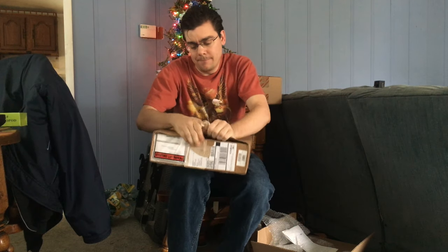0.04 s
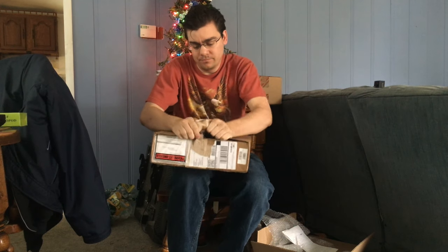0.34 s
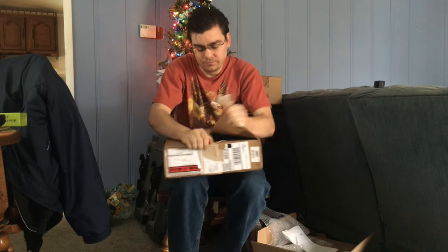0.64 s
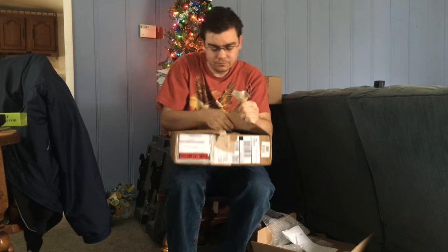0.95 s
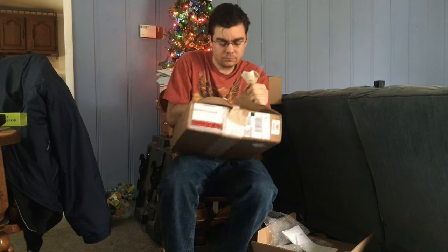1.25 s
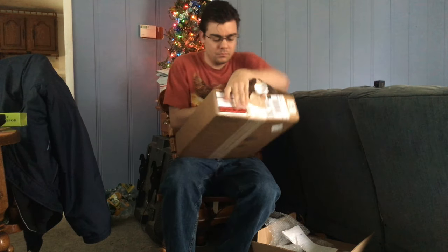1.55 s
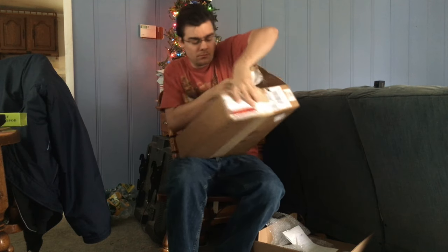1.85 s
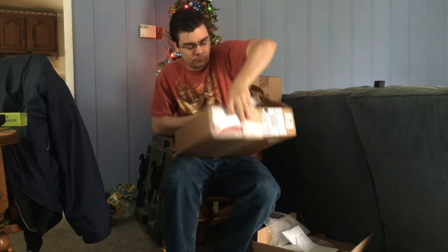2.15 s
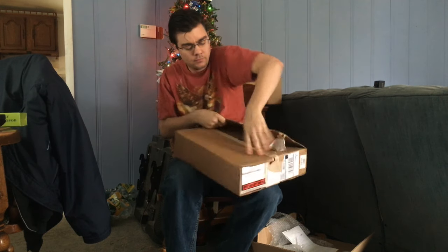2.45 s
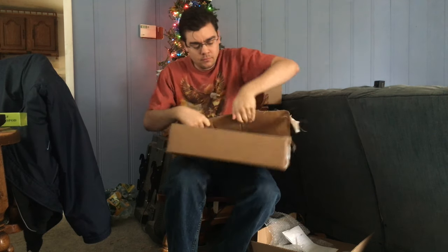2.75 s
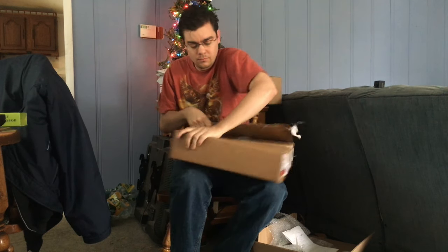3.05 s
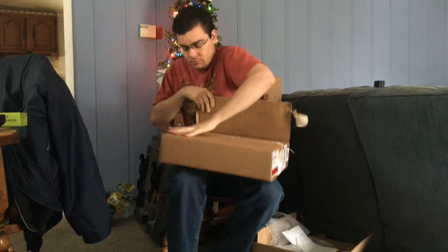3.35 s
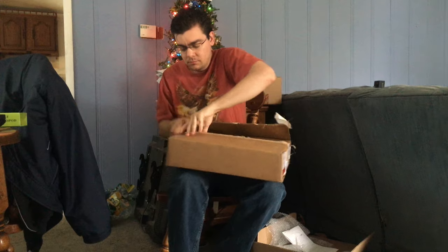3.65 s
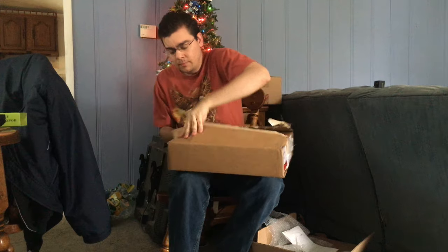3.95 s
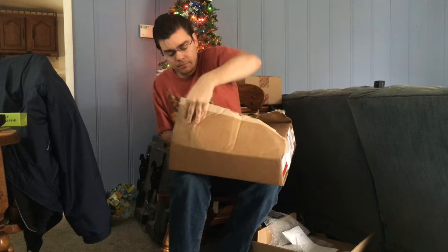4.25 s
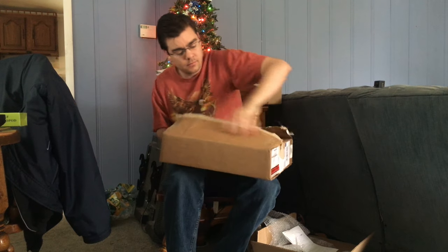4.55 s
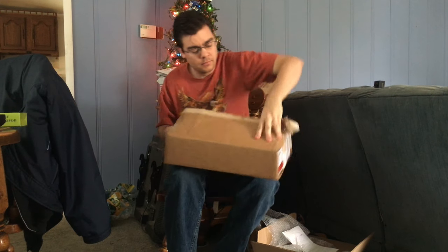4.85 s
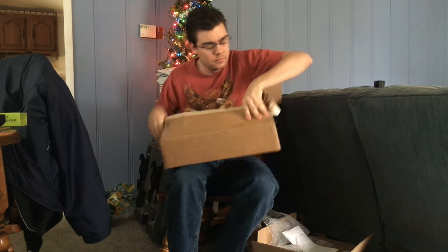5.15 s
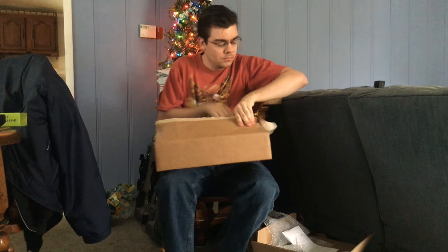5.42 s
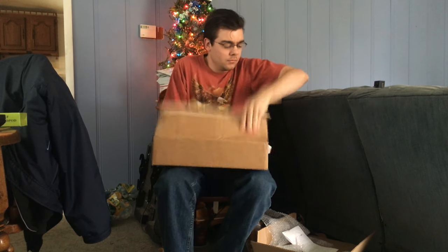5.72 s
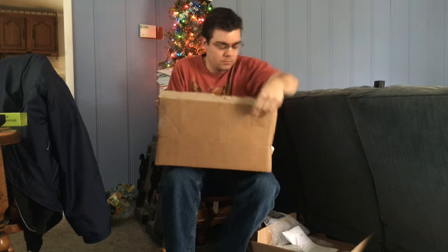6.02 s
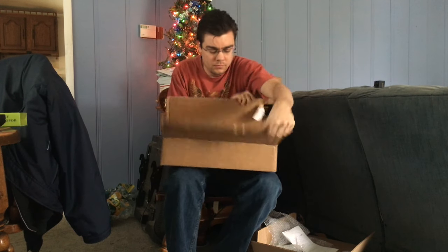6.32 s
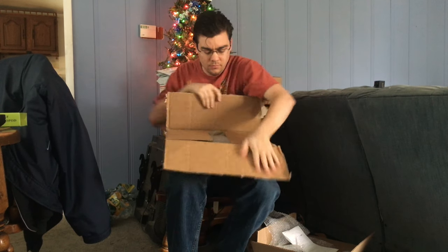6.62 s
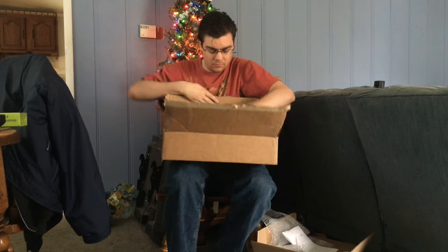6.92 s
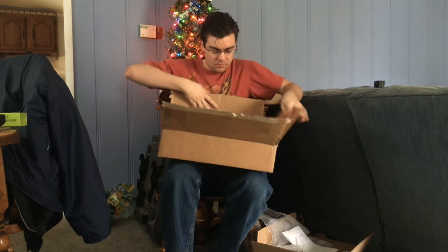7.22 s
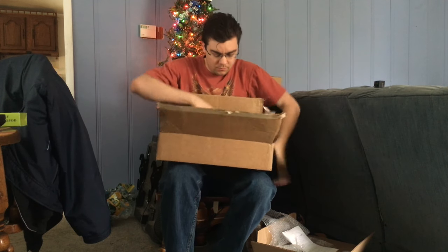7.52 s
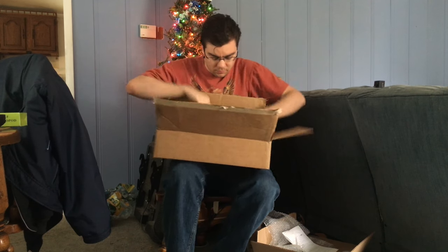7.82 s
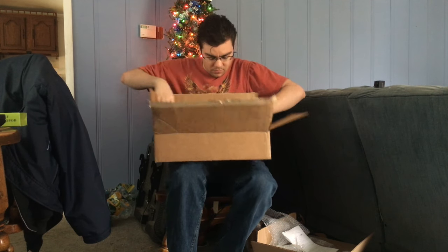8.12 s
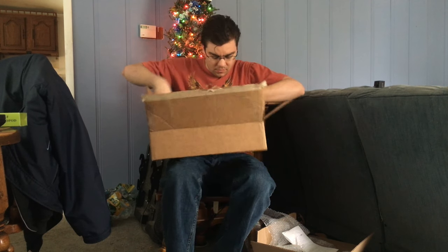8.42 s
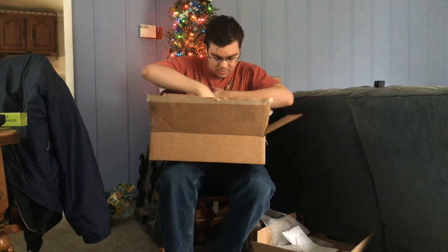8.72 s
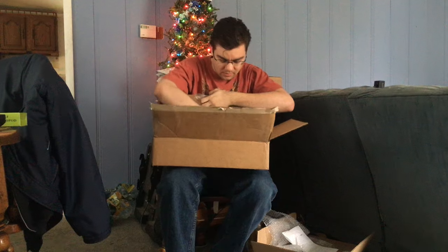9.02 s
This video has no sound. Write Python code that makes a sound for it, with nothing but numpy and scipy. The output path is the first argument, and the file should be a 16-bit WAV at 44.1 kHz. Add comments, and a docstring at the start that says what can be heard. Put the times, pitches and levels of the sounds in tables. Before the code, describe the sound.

Sharp bursts of ripping tape and cardboard come in quick succession as a box is pulled open by hand, with dry crinkles and briefly ringing flaps. A few separate tears follow among light knocks and rubbing. The box lands with a low, hollow thump, then softer scraping and hissing slides fade away. It is heard from a few steps off in a small, quiet room with a faint hum.

```python
"""A small furnished room: a few steps away, a cardboard shipping box is torn open on a lap.
Tape and glued flaps give way in bursts of tiny fractures that shake the panels, flaps and paper fibres.
Freed flaps twang and loose tape crinkles; hands knock, rub and scrape the board, and the hollow box
bumps on the knees. Faint room air and hum lie underneath. A limiter holds the loudest peaks."""
import sys
import numpy as np
from scipy import signal
from scipy.fft import rfft, irfft, next_fast_len
from scipy.io import wavfile
from scipy.ndimage import uniform_filter1d, minimum_filter1d, map_coordinates

SR = 44100
rng = np.random.default_rng(int(sys.argv[2]) if len(sys.argv) > 2 else 0)


def store_pcm(level_fs):
    """Save levels as 16-bit WAV."""
    pcm = np.round(np.clip(level_fs, -1, 1) * 32767).astype(np.int16)
    wavfile.write(sys.argv[1], SR, np.atleast_2d(pcm).T)


N = 408807
STRAIN_S = 0.008  # fibres strain this long before a break
ROOM_T60_S, ECHO_BUILD_S = (0.2, 0.28, 0.28), (0.0072, 0.0012, 0.0007)  # panel, flap, fibre


# freq_hz, gain_db
FIBRE_SPECTRUM = [(1900, 2), (2150, 3.5), (2500, 7), (3000, 2.5), (3500, 6), (4300, 3), (5000, 0),
                  (7200, -5.5), (8400, -3), (10300, -9), (11800, -6), (14500, -12.5), (17000, -14)]
# start_s, level_db, depth (0 tape, 1 board), length_s
RIPS = [(0.223, -36, 0.46, 0.0015), (0.337, -43.5, 0.23, 0.0053), (0.431, -31.5, 0.29, 0.0018),
        (0.476, -35.5, .05, 0.0026), (0.512, -15, 0.03, 0.0037), (0.526, -16, 0.46, 0.0037),
        (0.561, -17, 0.5, 0.0017), (0.594, -20, 0.17, 0.0032), (0.599, -29, 0.59, .0012),
        (0.631, -22.5, .25, 0.0067), (0.716, -18.5, 0.39, 0.008), (0.721, -25, 1, 0.0016),
        (1.103, -32, 0.23, 0.011), (1.136, -15, 0.24, 0.013), (1.142, -18.5, 0.73, 0.0029),
        (1.162, -20.5, 0.48, 0.012), (1.335, -15.5, 0.5, 0.017), (1.417, -30.5, 0.47, 0.0062),
        (1.624, -28.5, 0.4, 0.0082), (1.759, -11.5, 0.73, 0.018), (1.784, -14.5, 0.89, 0.0063),
        (3.133, -20.5, 0.58, 0.022), (3.174, -16.5, 0.64, 0.0052), (3.801, -40.5, 0.13, 0.0062),
        (4.032, -31.5, 0.53, 0.017), (4.1, -14, 0.72, 0.0033), (4.162, -22, 0.72, 0.006),
        (5.728, -26, 0.57, 0.014), (5.78, -16, 0.81, 0.0056)]

def rips():
    """Tape and glue give way; deeper tears shake panels and flaps more and crackle less."""
    tape_db, board_db = np.array([-28, -8.5, 2]), np.array([5, 0, -8.5])  # panel, flap, fibre
    events = []
    for start_s, level_db, depth, length_s in RIPS:
        drive_db = tape_db + np.clip(depth, 0, 1) * (board_db - tape_db)
        events.append((start_s, *(level_db + drive_db), length_s))
    return excite_box(events, fracture_force, FIBRE_SPECTRUM,
                      trims_db=(2.5, 1.3, 0.5), wets_db=(6, 2, -1.5), soft_hz=5100)


def fracture_force(t, length_s, crack_s=0.0028, spread_db=7, strain_db=-27):
    """A few fibres give, then one sharp break and a fading run of snaps; shorter runs break harder."""
    envelope = np.where(t < 0, amp(strain_db) * (1 + t / STRAIN_S), np.exp(-(t / length_s) ** 2))
    snaps = slips(len(t), rate_hz=1500, spread_db=spread_db) * envelope
    crack = crack_s / length_s * (t == 0)
    return snaps / (np.linalg.norm(snaps) + 1e-9) + crack


def slips(size, rate_hz, spread_db):
    """Tiny fractures or slips, random in time and strength."""
    happens = rng.random(size) < rate_hz / SR
    return happens * amp(spread_db * rng.standard_normal(size)) * rng.choice([-1, 1], size)


def excite_box(events, force, paper_spectrum, trims_db, wets_db, soft_hz):
    """A force drives the box at each event: start_s, panel_db, flap_db, fibre_db, length_s."""
    track, size = np.zeros(N), 2 ** 14
    t = (np.arange(SR // 9) - round(STRAIN_S * SR)) / SR
    panel, flap, fibre = box_responses(size, paper_spectrum)
    soft_flap = flap / (1 + 1j * np.fft.rfftfreq(size, 1 / SR) / soft_hz)  # soft contact: less treble
    for start_s, *levels_db, length_s in events:
        drive = force(t, length_s)
        grip = grip_colour(size, depth_db=2.2, step_hz=160)
        voices = zip((panel, soft_flap, fibre), levels_db, trims_db, ROOM_T60_S, wets_db, ECHO_BUILD_S)
        for response, level_db, trim_db, t60_s, wet_db, build_s in voices:
            sound = irfft(rfft(room(drive, t60_s, wet_db, build_s), size) * response * grip)
            add(track, start_s - STRAIN_S, leveled(sound, level_db + trim_db))
    return track


# pitch_hz, width_hz, gain_db
PANEL_MODES = [(177.9, 18, 6), (202.4, 22, 4), (244.4, 37, -0.5), (392, 14, -8)]
# pitch_hz, width_hz, gain_db
FLAP_MODES = [(386, 79, 2.5), (518, 45, 2), (568, 83, 1.5), (704, 108, 3), (902, 82, -2), (1092, 99, 2),
              (1215, 80, 1), (1557, 590, -1)]

def box_responses(size, paper_spectrum, floor_db=-14):
    """Broad panels ring low, stiff flaps in the middle, paper fibres in the treble."""
    hz = np.fft.rfftfreq(size, 1 / SR) + 1

    def ring(modes):
        power = sum(amp(db) ** 2 / (1 + (2 * (hz - pitch_hz) / width_hz) ** 2)
                    for pitch_hz, width_hz, db in modes)
        return np.sqrt(amp(floor_db) ** 2 + power)

    def band(low_hz, high_hz):
        return 1 / np.sqrt((1 + (low_hz / hz) ** 8) * (1 + (hz / high_hz) ** 12))

    panel = ring(PANEL_MODES) * band(45, 400)
    flap = ring(FLAP_MODES) * band(400, 2000)
    fibre = amp(along(paper_spectrum, hz)) * band(2000, SR)
    return causal(panel), causal(flap), causal(fibre)


def grip_colour(size, depth_db, step_hz):
    """Each new grip shifts the board's finer resonances."""
    hz = np.fft.rfftfreq(size, 1 / SR)
    knot_index = 6 * np.log1p(hz / (6 * step_hz)) + hz / 500
    ripple = map_coordinates(rng.standard_normal(200), [knot_index], mode="mirror")
    return causal(amp(depth_db * ripple))


# start_s, pitch_hz, level_db, q
TWANGS = [(0.527, 1620, -18, 9.7), (0.561, 1500, -23, 3.5), (0.718, 1490, -19.5, 3.6),
          (0.721, 3350, -20.5, 14), (1.627, 440, -22.5, 3.5), (1.77, 503, -16.5, 4.1),
          (3.179, 707, -16, 8.5), (4.048, 1100, -19.5, 5.1), (5.783, 495, -24, 6)]

def twangs():
    """A flap springs free and rings briefly at its own pitch, carried on by the room."""
    track, size = np.zeros(N), 2 ** 14
    hz = np.fft.rfftfreq(size, 1 / SR) + 1
    for start_s, pitch_hz, level_db, q in TWANGS:
        mode = 1 / (1 + 1j * q / 2 * (hz / pitch_hz - pitch_hz / hz)) ** 2
        ring = irfft(rfft(room(np.ones(1), t60_s=0.26, wet_db=2), size) * mode)
        add(track, start_s, amp(level_db) * ring / np.std(ring[:SR // 40]))
    return track


# start_s, level_db, length_s
CRINKLES = [(0.223, -39.5, 0.00081), (0.511, -20, .002), (0.588, -21, 0.0012), (0.708, -22, 0.0044),
            (0.717, -21, .007), (1.143, -17.5, 0.0092), (2.943, -38.5, 0.0036), (3.03, -41.5, .002),
            (4.103, -36, .002), (5.37, -37.5, .008), (5.73, -32, .007), (5.775, -43, 0.0018),
            (6.157, -44, 0.0039)]

def crinkles(low_hz=6500, tilt_db_per_oct=-2):
    """Thin tape buckles in dry, bright clicks, too light to move the box."""
    track, size = np.zeros(N), 2 ** 14
    t, hz = np.arange(SR // 10) / SR - STRAIN_S, np.fft.rfftfreq(size, 1 / SR) + 1
    highpass = hz ** 2 / np.hypot(hz ** 2, low_hz ** 2)
    film = causal(amp(tilt_db_per_oct * np.log2(1 + hz / low_hz)) * highpass)
    for start_s, level_db, length_s in CRINKLES:
        force = fracture_force(t, length_s, crack_s=0.0015, spread_db=6, strain_db=-34)
        clicks = room(force, t60_s=0.22, wet_db=-5)
        grip = grip_colour(size, depth_db=2.5, step_hz=300)
        add(track, start_s - STRAIN_S, leveled(irfft(rfft(clicks, size) * film * grip), level_db))
    return track


# start_s, level_db, flap_over_panel_db
KNOCKS = [(0.164, -35, -8.5), (0.904, -37.5, -16), (1.625, -27, -16), (2.056, -31.5, -10), (2.365, -33, -7),
          (2.48, -29.5, -11.5), (2.68, -39, -8), (2.936, -35, -13), (2.984, -31.5, 2), (3.029, -27.5, -10),
          (3.595, -26, -20), (3.735, -32.5, -5), (3.811, -34.5, -15), (4.048, -24.5, 27), (4.67, -36, -26),
          (5.281, -34.5, -10), (5.469, -28, -10.5), (5.525, -31, -11), (5.634, -29.5, -1.5),
          (6.303, -18.5, -22), (6.56, -30.5, -8), (6.624, -34, -18), (6.878, -40.5, -1), (7.63, -38.5, 6),
          (8.123, -31, 23), (8.143, -29.5, 3), (8.31, -40.5, 2), (8.592, -42, 2), (8.726, -32.5, 3)]

def knocks(length_s=0.0089, crunch_db=-9, crunch_follow=0.55):
    """Hands and flaps knock and the corrugation yields; edge hits give more flap and crunch, less panel."""
    def push(t, length_s):
        return fracture_force(t, length_s, crack_s=0.003, spread_db=3.5)

    events = []
    for start_s, level_db, edge_db in KNOCKS:
        panel_db = -10 * np.log10(1 + amp(edge_db) ** 2)
        flap_db = panel_db + edge_db
        fibre_db = crunch_db + crunch_follow * flap_db
        events.append((start_s, level_db + panel_db, level_db + flap_db, level_db + fibre_db, length_s))
    return excite_box(events, push, FIBRE_SPECTRUM, trims_db=(2.5, 2.5, 0), wets_db=(1, 2, 1), soft_hz=945)


# freq_hz, gain_db
HOLLOW_SPECTRUM = [(15, -12), (32, -2), (55, 0), (75, -4), (115, -4), (170, -12), (300, -32), (900, -80)]
# start_s, level_db
BUMPS = [(0.535, -19), (0.723, -21), (1.148, -23), (1.777, -19), (2.061, -26), (2.479, -23), (2.681, -27),
         (2.989, -22.5), (3.185, -18), (3.611, -22.5), (3.808, -20.5), (4.102, -20), (5.79, -20),
         (6.303, -6), (7.302, -29), (7.502, -35), (8.153, -21.5), (8.47, -33)]

def bumps(trim_db=1):
    """The hollow box lands on the knees: one dull push of air."""
    track, size = np.zeros(N), 2 ** 15
    hollow = causal(amp(along(HOLLOW_SPECTRUM, np.fft.rfftfreq(size, 1 / SR))))
    for start_s, level_db in BUMPS:
        boom = irfft(rfft(room(np.ones(1), t60_s=0.15, wet_db=1.5), size) * hollow)
        add(track, start_s, amp(level_db + trim_db) * boom / np.abs(boom).max())
    return track


# freq_hz, gain_db
SLIDE_SPECTRUM = [(2000, -0.5), (2800, 1.5), (4200, -0.5), (5500, -2.5), (7200, -7), (8600, -4),
                  (10400, -9), (12200, -4.5), (14500, -11.5), (17000, -9)]
# start_s, level_db, brightness_db, length_s
SCRAPES = [(2.859, -43, 7, 0.034), (6.23, -44.5, 4.5, 0.033), (7.203, -37.5, 1, 0.087),
           (7.283, -34.5, -0.5, 0.03), (7.4, -40, 3, 0.13), (7.467, -34, -5, 0.075),
           (7.909, -35.5, -1.5, 0.055), (8.007, -34, -15, 0.06), (8.098, -37, 2, 0.052)]

def scrapes(panel_db=-6.5, bite_s=0.0016):
    """Board drags over board: dense stick-slip swells as an edge bites and fades as it slides off."""
    def drag(t, length_s):
        envelope = np.clip(t / bite_s, 0, 1) * np.exp(-(t / length_s) ** 2)
        return slips(len(t), rate_hz=1800, spread_db=2.5) * envelope

    events = [(start_s, db + panel_db, db, db + bright_db, length_s)
              for start_s, db, bright_db, length_s in SCRAPES]
    return excite_box(events, drag, SLIDE_SPECTRUM, trims_db=(1, 2.5, 2), wets_db=(0, 0, 0), soft_hz=8000)


# start_s, length_s, start_hz, level_db, width_ratio
RASPS = [(4.695, 0.053, 1202, -45, 0.22), (5.272, 0.044, 1110, -42.5, 0.21),
         (7.198, 0.029, 4750, -40, 0.13), (7.905, 0.088, 3020, -39.5, 0.33), (7.95, 0.099, 1700, -36, .33)]

def rasps(fall_oct_per_s=3.4, rough_db=3, slip_hz=110):
    """A flap's edge sticks and slips in one narrow resonance, falling as more of it slides free."""
    track, t = np.zeros(N), np.arange(N) / SR
    for start_s, length_s, start_hz, level_db, width_ratio in RASPS:
        pitch_hz = start_hz * 2 ** (-fall_oct_per_s * np.clip(t - start_s, 0, length_s))
        phase = 2 * np.pi * np.cumsum(pitch_hz) / SR
        width_hz = width_ratio * start_hz
        grain = wobble(width_hz) * np.cos(phase) + wobble(width_hz) * np.sin(phase)
        track += strokes([(start_s, length_s, level_db)]) * unit(grain * amp(rough_db * wobble(slip_hz)))
    return track


# start_s, length_s, level_db, brightness_db
RUBS = [(0, 0.033, -38, 3.5), (0.092, 0.1, -48, 3), (0.426, 0.069, -43, 11), (0.815, 0.11, -48.5, 5),
        (2.006, 0.2, -44.5, 1), (2.242, 0.24, -40.5, -1), (2.538, 0.31, -43.5, -2),
        (3.076, 0.19, -37, -3.5), (3.338, 0.13, -50, 3), (3.977, 0.089, -40.5, -5.5),
        (4.365, 0.12, -43, 2.5), (4.63, 0.12, -40.5, -7), (4.88, 0.11, -42, -8), (5.106, 0.26, -40.5, -1),
        (5.497, 0.32, -46, -7.5), (5.865, 0.16, -44, -4), (6.535, 0.063, -41, 3), (6.76, 0.15, -42.5, 2),
        (8.187, 0.61, -48.5, 4), (8.583, 0.18, -48, -8), (8.916, 0.23, -59, 10.5)]

def rubs(hold_db=-48.5, trims_db=(-6.5, -2.5, -0.7), grip_db=-2.5, lumps_db=4):
    """Hands hold and shift on the box: fine slips under an unsteady grip; the panels answer in lumps."""
    track, size = np.zeros(N), 2 * next_fast_len(N // 2 + SR // 2)
    flap = np.hypot(amp(hold_db), strokes([row[:3] for row in RUBS]))
    bright_rubs = [(start_s, length_s, db + bright_db) for start_s, length_s, db, bright_db in RUBS]
    fibre = np.hypot(amp(hold_db), strokes(bright_rubs))
    friction = np.tanh(slips(N, rate_hz=2500, spread_db=6.5) / 10)
    force = friction * amp(grip_db * wobble(30))
    panel = flap * amp(lumps_db * wobble(28))
    voices = zip(box_responses(size, SLIDE_SPECTRUM), (panel, flap, fibre), trims_db, ROOM_T60_S)
    for response, envelope, trim_db, t60_s in voices:
        rustle = irfft(rfft(room(force, t60_s, wet_db=3), size) * response)[:N]
        track += envelope * amp(trim_db) * unit(rustle)
    return wandering_contact(track)


# start_s, length_s, level_db
GLIDES = [(0.79, 0.15, -43), (3.39, 0.23, -48.5), (4.5, 0.19, -43.5), (6.64, 0.16, -40), (7.42, 0.48, -46),
          (7.93, 0.13, -34.5), (8.33, 0.38, -41.5)]

def glides(low_hz=3000, tilt_db_per_oct=1.5):
    """Skin sliding on smooth paper only hisses."""
    hz = np.fft.rfftfreq(N, 1 / SR) + 1
    highpass = hz ** 2 / (hz ** 2 + low_hz ** 2)
    colour = amp(along(SLIDE_SPECTRUM, hz) + tilt_db_per_oct * np.log2(hz / low_hz)) * highpass
    hiss = irfft(rfft(slips(N, rate_hz=7400, spread_db=3.5)) * colour, N)
    return wandering_contact(strokes(GLIDES) * unit(hiss))


def strokes(rows, attack_s=0.014, sag_db_per_s=9, release_s=0.03):
    """Envelope of sliding strokes: each takes hold, slows a little and lets go."""
    power, t = np.zeros(N), np.arange(SR) / SR
    for start_s, length_s, level_db in rows:
        shape = np.minimum(t / attack_s, 1) * np.exp(-np.maximum(t - length_s, 0) / release_s)
        add(power, start_s, (amp(level_db - sag_db_per_s * t) * shape) ** 2)
    return np.sqrt(power)


def wandering_contact(sound, depth_db=2.13):
    """A slide's colour drifts as the contact moves over the board."""
    frames = signal.stft(sound, nperseg=512)[2]
    across_bins = uniform_filter1d(rng.standard_normal(frames.shape), size=6, axis=0)
    drift = uniform_filter1d(across_bins, size=16, axis=1)
    return signal.istft(frames * amp(depth_db * unit(drift)), nperseg=512)[1][:N]


def room(force, t60_s, wet_db, build_s=0.00024, treble_hz=5500):
    """Direct sound plus a diffuse tail, shorter in the treble; every slip has its own echoes."""
    t = np.arange(SR // 4) / SR
    sound = np.pad(force, (0, len(t) - 1))
    for side, decay_s, tail_db in ("low", t60_s, wet_db), ("high", 0.82 * t60_s, wet_db + 0.5):
        decay = amp(-120 * t / decay_s) * (1 - np.exp(-t / build_s))
        energy = np.abs(signal.fftconvolve(force ** 2, decay / decay.sum()))
        crossover = signal.butter(2, treble_hz, side, fs=SR, output="sos")
        noise = signal.sosfilt(crossover, rng.standard_normal(len(sound)))
        sound = sound + amp(tail_db) * np.sqrt(energy) * noise
    return sound


# freq_hz, gain_db
AIR_SPECTRUM = [(20, -14), (64, 16), (200, -22), (1100, -3.5), (2200, -35), (17000, -51)]
# pitch_hz, level_db
ELECTRICAL_TONES = [(54, -56), (15735, -67)]

def background(air_db=-60, sway_db=-48):
    """Room air, mains hum, a thin electrical whine and the low flutter of the box being moved."""
    hz, t = np.fft.rfftfreq(N, 1 / SR), np.arange(N) / SR

    def noise(spectrum):
        return unit(irfft(rfft(rng.standard_normal(N)) * amp(along(spectrum, hz)), N))

    sway = noise(HOLLOW_SPECTRUM) * amp(3.5 * wobble(6))
    tones = sum(amp(db) * np.sqrt(2) * np.sin(2 * np.pi * pitch_hz * t) for pitch_hz, db in ELECTRICAL_TONES)
    return amp(air_db) * noise(AIR_SPECTRUM) + amp(sway_db) * unit(sway) + tones


def amp(db):
    """Decibels to gain."""
    return 10 ** (np.asarray(db) / 20)


def unit(x):
    """Scale to rms 1."""
    return x / np.sqrt(np.mean(x ** 2) + 1e-20)


def leveled(sound, level_db):
    """Scale to the energy of 25 ms at level_db."""
    return amp(level_db) * sound / np.sqrt(np.sum(sound ** 2) / (SR / 40))


def along(spectrum, hz):
    """Interpolate gain_db on a log frequency axis."""
    freq_hz, gain_db = np.transpose(spectrum)
    return np.interp(np.log(hz + 1), np.log(freq_hz), gain_db)


def wobble(rate_hz):
    """Smooth random curve, rate_hz knots a second."""
    knots = rng.standard_normal(int(N * rate_hz / SR) + 4)
    return map_coordinates(knots, [np.arange(N) * rate_hz / SR])


def causal(gain):
    """Minimum-phase response with this gain."""
    cepstrum = irfft(np.log(np.maximum(gain, 1e-6)))
    half = len(cepstrum) // 2
    cepstrum[1:half] *= 2
    cepstrum[half + 1:] = 0
    return np.exp(rfft(cepstrum))


def add(track, start_s, sound):
    """Mix a sound in at start_s."""
    start = max(round(start_s * SR), 0)
    track[start:start + len(sound)] += sound[:max(N - start, 0)]


def scene():
    """Box, hands and room in mono."""
    box = rips() + knocks() + scrapes() + twangs() + rasps() + crinkles() + bumps()
    return (box + rubs() + glides() + background())[None]


def record(dry, ceiling=1.0, top_hz=17300):
    """Fast peak limiter, then a brick-wall lowpass."""
    needed = np.minimum(1, ceiling / (np.abs(dry) + 1e-9))
    gain = uniform_filter1d(minimum_filter1d(needed, size=65), size=65)
    return irfft(rfft(dry * gain) * (np.fft.rfftfreq(N, 1 / SR) < top_hz), N)


dry = scene()
out = record(dry)
store_pcm(out)
```